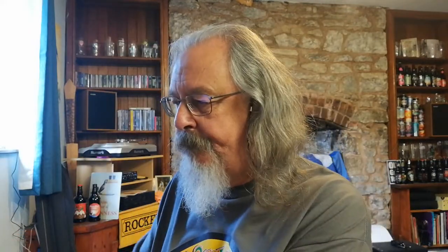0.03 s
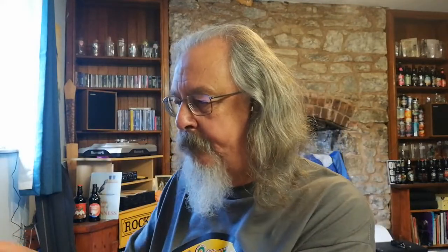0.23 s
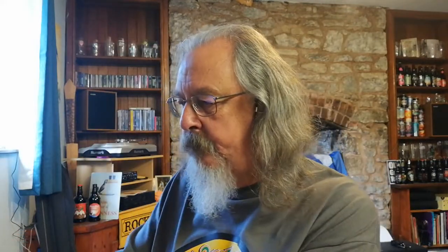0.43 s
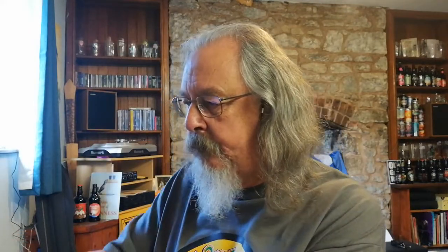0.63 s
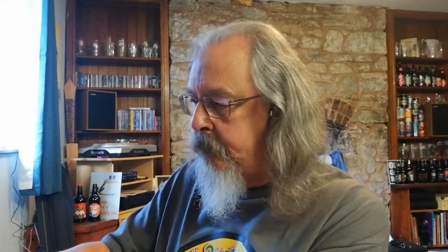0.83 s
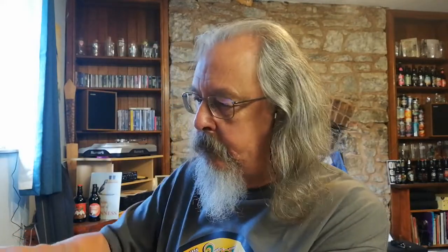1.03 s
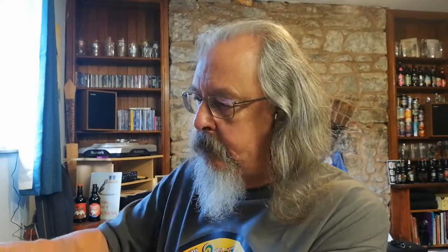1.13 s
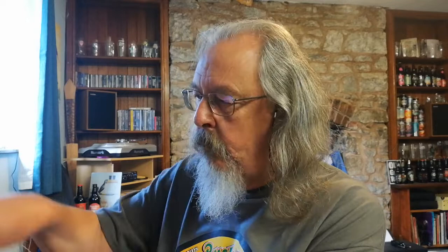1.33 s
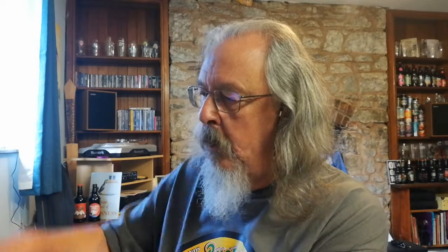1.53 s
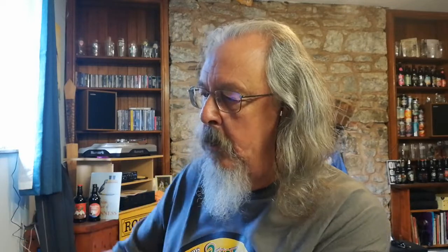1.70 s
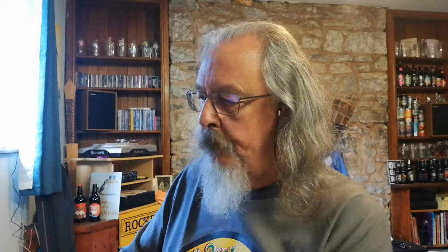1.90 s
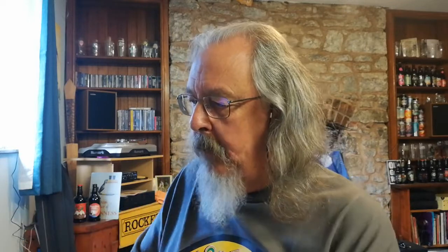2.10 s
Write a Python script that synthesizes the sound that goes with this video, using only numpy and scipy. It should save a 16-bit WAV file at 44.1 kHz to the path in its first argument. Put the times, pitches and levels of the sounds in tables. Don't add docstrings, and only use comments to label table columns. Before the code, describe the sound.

A glass bottle is opened with a metal opener: clinks, short gas hiss, cap pops and rings

```python
import sys
import numpy as np
from scipy import signal
from scipy.fft import rfft, irfft, next_fast_len
from scipy.io import wavfile
from scipy.ndimage import uniform_filter1d

SR = 44100
rng = np.random.default_rng(int(sys.argv[2]) if len(sys.argv) > 2 else 0)


def waveform_to_disk(signal):
    frames = np.transpose(np.atleast_2d(signal))
    scaled = np.clip(frames, -1, 1) * 32767
    samples = np.round(scaled).astype(np.int16)
    wavfile.write(sys.argv[1], SR, samples)


def boost(x):
    u = np.asarray(x, float) / 20
    return 10 ** u


N = 95167
T = np.arange(N) / SR
BAND_EDGES_HZ = 22 * 2 ** np.arange(0, 9.8, .5)

# frequency in Hz, level in dB.
AIR_COLOUR = [(120, -38), (200, -8), (612, -14), (1060, -4), (1500, -9), (2330, -15), (10000, -14.5),
              (13000, -21), (16000, -21)]
# frequency in Hz, level in dB.
RUMBLE_COLOUR = [(15, -31), (25, 0.5), (64, -2), (108, -25.5), (250, -5), (320, -63), (550, -120)]
# frequency in Hz, likeness from 0 to 1.
AIR_LIKENESS = [(100, .99), (200, .7), (380, 0)]
AIR_DB, RUMBLE_DB = -56, -56

# frequency in Hz, t60 in seconds.
ROOM_T60 = [(100, 0.62), (500, 0.24), (2000, 0.27), (6000, .22), (14000, 0.12)]
# frequency in Hz, likeness from 0 to 1.
ROOM_LIKENESS = [(150, .99), (400, .85), (1000, .3), (4000, 0)]
# frequency in Hz, difference in dB.
PORT_LEAN = [(200, 0), (350, 0), (690, 5), (2100, 2.5), (4000, 1.5), (8000, -1), (13000, 4.5)]
# frequency in Hz, lag in radians.
PORT_LAG = [(150, 0), (340, -.7), (690, -2.4), (1300, -.8), (2100, -3.2), (4000, 0), (9000, -2.5)]
TICK_ROOM_DB, KNOCK_ROOM_DB, RING_ROOM_DB, GAS_ROOM_DB, CAP_ROOM_DB = -5, -11, -13, 1.5, -29

# start in seconds, peak in dB, colour in Hz, length in seconds.
KNOCKS = [(0.12, -34, 100, 0.025), (0.159, -45.5, 126, 0.088), (0.203, -43, 123, 0.14),
          (0.277, -43, 620, 0.06), (0.306, -41.5, 68.5, 0.027), (0.454, -29, 136, 0.036),
          (0.612, -29.5, 146, 0.016), (0.681, -42, 75.6, 0.022), (1.312, -20, 110, 0.02),
          (1.427, -31, 70, 0.047), (1.537, -37, 120, 0.028), (1.649, -34.5, 260, 0.012),
          (1.724, -14, 302, 0.011), (1.844, -15.5, 200, 0.0084), (1.862, -18.5, 300, 0.018),
          (1.941, -25.5, 200, 0.026), (1.987, -25, 484, 0.012), (1.998, -8, 400, 0.006),
          (2.031, -22, 250, .006), (2.049, -23.5, 185, 0.012), (2.075, -39, 88.5, 0.018),
          (2.0065, -11, 380, .007), (2.059, -24, 200, .008), (1.852, -22, 220, .006), (.7, -48, 550, .03),
          (1.49, -38, 550, .04)]
# frequency in Hz, width in Hz, level in dB.
DESK_MODES = [(125, 40, -5), (276.7, 27, -7), (472, 40, -14), (647, 127, -0.5), (1000, 270, -29)]

# start in seconds, peak in dB, colour in Hz, width in Hz, length in seconds.
TICKS = [(0.455, -8.5, 13300, 4030, 0.0035), (.602, -16.5, 2470, 2440, 0.0073),
         (.6025, -9.5, 9200, 2500, 0.0012), (.677, -41, 4500, 600, 0.0045), (1.3115, -4, 5000, 9700, 0.003),
         (1.318, -10.5, 2090, 2870, 0.024), (1.3882, -13, 8000, 6000, 0.0038),
         (1.43, -13, 11000, 3500, 0.005), (1.435, -29, 2460, 5040, 0.055),
         (1.456, -40, 13500, 3000, 0.0037), (1.471, -24, 8000, 9000, 0.0021),
         (1.5545, -28, 11000, 9120, .002), (1.568, -17.5, 3300, 1200, 0.0019),
         (1.567, -21.5, 10500, 3000, 0.0043), (1.649, -20, 1560, 710, 0.0043),
         (1.655, -26.5, 1550, 1510, .002), (1.7278, -4, 3200, 1800, 0.0035),
         (1.7285, -12.5, 890, 1840, 0.03), (1.8585, -18, 3300, 1500, 0.003),
         (1.868, -35, 3200, 1000, 0.0018), (2.001, -29.5, 1500, 2040, 0.012),
         (2.153, -36, 9000, 8040, 0.008), (.46, -20, 7500, 3000, .003), (1.3155, -6, 8000, 9000, .003),
         (1.325, -12, 8800, 4000, .003), (1.398, -20, 8000, 4000, .003), (1.4265, -25, 11000, 5000, .003),
         (1.5652, -28, 3000, 2500, .002), (1.736, -18, 3200, 900, .003), (.61, -24, 1500, 2500, .006)]

# frequency in Hz, level in dB, t60 in seconds.
BOTTLE = [(1408, 4, .33), (1402, 1.5, .55), (1739, -1, .1), (1960, -8, .08), (3967, -8, .45),
          (3978, -10, .3), (7181, 5, .13), (7531, 9, .15), (11820, -5, .07), (13650, -8, .07)]
HOOKED = [(1384, 6, .11), (2234, 2, .06), (3187, -4, .05), (4430, 17, .015), (4199, -4, .08),
          (6589, -8, .05), (9180, 14, .02)]
TOUCHED = [(1400, 6, .07), (4650, 2, .03)]
PRIED = [(1373, 0, .06), (1949, 0, .08), (2541, 6, .05), (4124, -2, .08), (4630, 8, .04), (6670, 6, .04),
         (8812, 14, .045), (9878, 0, .06), (12000, 8, .02)]
RATTLE_ONE = [(4037, -3, .03), (7203, -14, .04), (8032, 9, .035), (12850, -14, .12), (14000, -8, .04)]
RATTLE_TWO = [(797, -20, .12), (2907, -20, .06), (4511, 0, .055), (7989, 1, .04), (9442, 3, .03),
              (12820, 6, .035), (13930, -10, .04), (14800, -20, .15)]
RATTLE_THREE = [(3994, -6, .13), (4554, -18, .1), (7332, -10, .15), (10490, -14, .07), (12780, -17, .35),
                (14290, -16, .1), (14750, -20, .1)]
SHAKEN = [(2740, -5, .03), (3340, 0, .04)]
LANDED = [(3300, 0, .02), (12800, -10, .1)]
RINGING_PARTS = [BOTTLE, HOOKED, TOUCHED, PRIED, RATTLE_ONE, RATTLE_TWO, RATTLE_THREE, SHAKEN, LANDED]
# start in seconds, level in dB, time of the damping grip in seconds,
# unevenness in dB.
RINGS = [
    (0.4564, -33, .6, 5),
    (.602, -34, .675, 5),
    (.675, -46, .8, 3),
    (1.312, -22.5, 1.43, 5),
    (1.388, -21, 1.43, 4),
    (1.43, -15, 1.555, 3),
    (1.4714, -22, 1.555, 3),
    (1.567, -30, 1.7, 3),
    (1.859, -32, 1.95, 3),
]
GRIP_DB_PER_S, WOBBLE_STEP_S = 3000, 0.00466

# time in seconds, level in dB.
GAS_LEVEL = [(1.038, -64), (1.044, -26.5), (1.058, -18), (1.108, -17.5), (1.153, -17.5), (1.178, -55),
             (1.2, -44)]
# frequency in Hz, level in dB per Hz.
GAS_COLOUR = [(410, -63), (700, -73), (898, -32), (2530, -25.5), (4610, -16.5), (6070, -19), (9230, 1),
              (13700, -6), (16000, -19)]
GAS_FLUTTER_DB, GAS_DB = 3, -1.5

# frequency in Hz, level in dB, t60 in seconds,
# facing in turns, steady share, side-lobe share, null-fill share, lag in turns.
CAP_AT_PORTS = [
    [(3995, 14, .154, .035, .076, .11, .13, 0), (7975, -5.6, .13, .338, -.75, .67, .75, 0),
     (11980, -19, .06, 0, 1.5, 0, 0, 0)],
    [(3995, 7, .14, -.155, -.35, -.05, .05, -.04), (7975, -4.8, .18, .214, -.48, -.51, .1, .25),
     (11980, -21, .09, 0, 1.5, 0, 0, .25)],
]
DROP_S, CAP_RISE_S, SPIN_PER_S, LAND_S, LAND_LOSS_DB = 1.729, .04, 11, 1.86, -2

# end in seconds, length in seconds, depth in dB.
DIPS = [
    (0.448, 0.0087, 0),
    (1.3, 0.02, -4.5),
    (1.727, 0.017, -20),
]
TOP_CUT_HZ = 15800
HEADROOM = 1.8


def rms_one(x):
    return x / np.sqrt(np.mean(x ** 2) + 1e-20)


def at_hz(points, hz):
    table = np.array(points)
    return np.interp(np.log(hz), np.log(table[:, 0]), table[:, 1])


def drift(rate_hz):
    r = np.exp(-2 * np.pi * rate_hz / SR)
    settle = 9000
    wander = signal.lfilter([1], [1, -2 * r, r * r], rng.standard_normal(N + settle))
    return rms_one(wander[settle:])


def resonance(x, hz, width_hz):
    r = np.exp(-np.pi * width_hz / SR)
    poles = [1, -2 * r * np.cos(2 * np.pi * hz / SR), r * r]
    return signal.lfilter([(1 - r * r) / 2, 0, (r * r - 1) / 2], poles, x)


def noise_bands(likeness, size):
    white = rng.standard_normal((2, 2, size))
    for k, (low, high) in enumerate(zip(BAND_EDGES_HZ, BAND_EDGES_HZ[1:])):
        band = signal.butter(2, [low, high], "band", fs=SR, output="sos")
        mid, side = signal.sosfilt(band, white[k % 2])
        hz = np.sqrt(low * high)
        alike = np.clip(at_hz(likeness, hz), 0, 1)
        yield hz, np.sqrt(1 + alike) * mid + np.sqrt(1 - alike) * side * [[1], [-1]]


def burst(length_s, size):
    t = np.arange(size) / SR
    decay = np.exp(-2 * t / max(length_s, 1e-4))
    return rng.standard_normal(size) * decay * np.clip(t / 0.00018, 0, 1)


def add(out, start_s, db, piece):
    i = int(start_s * SR)
    scaled = boost(db) * piece / np.abs(piece).max()
    out[..., i:i + piece.shape[-1]] += scaled[..., :N - i]


def air():
    parts = [(hz, v * boost(1.5 * drift(18))) for hz, v in noise_bands(AIR_LIKENESS, N)]
    hiss = sum(v * boost(at_hz(AIR_COLOUR, hz)) for hz, v in parts if hz > 200)
    rumble = sum(v * boost(at_hz(RUMBLE_COLOUR, hz)) for hz, v in parts if hz < 200)
    return boost(AIR_DB) * rms_one(hiss) + boost(RUMBLE_DB) * rms_one(rumble)


def room_tail():
    t = np.arange(SR // 2) / SR
    tail = np.zeros((2, len(t)))
    for hz, v in noise_bands(ROOM_LIKENESS, len(t)):
        t60 = at_hz(ROOM_T60, hz)
        tail += v * boost(-60 * t / t60) / np.sqrt(t60)
    onset = np.clip(t / 0.0017 - .3, 0, 1)
    return rms_one(tail * onset) / np.sqrt(len(t))


def through_ports(direct, sent):
    size = next_fast_len(N + SR)
    hz = np.maximum(np.arange(size // 2 + 1) * SR / size, 1)
    half = boost(at_hz(PORT_LEAN, hz) / 2) * np.exp(-.5j * at_hz(PORT_LAG, hz))
    spectrum = rfft(direct, size) + rfft(sent, size) * rfft(room_tail(), size)
    return irfft(spectrum * [half, 1 / half], size)[:, :N]


def desk_knocks():
    out = np.zeros(N)
    for start_s, db, colour_hz, length_s in KNOCKS:
        soften = signal.butter(2, 3.5 * colour_hz, fs=SR, output="sos")
        push = resonance(burst(length_s, 8192), colour_hz, 0.7 * colour_hz)
        push = signal.sosfilt(soften, push)
        desk = sum(boost(d) * resonance(push, hz, width_hz) for hz, width_hz, d in DESK_MODES)
        add(out, start_s, db, push + desk)
    return out


def metal_ticks():
    out = np.zeros(N)
    for start_s, db, hz, width_hz, length_s in TICKS:
        crack = resonance(burst(length_s, 2048), hz, width_hz)
        add(out, start_s, db, 0.6 * crack + resonance(crack, hz, width_hz))
    return out


def struck_parts():
    out = np.zeros(N + SR)
    t = np.arange(SR // 2) / SR
    for (start_s, db, until_s, uneven_db), part in zip(RINGS, RINGING_PARTS):
        i = int(start_s * SR)
        grip = GRIP_DB_PER_S * np.maximum(t + start_s - until_s, 0)
        for hz, mode_db, t60 in part:
            chance = np.interp(t / WOBBLE_STEP_S, np.arange(200), rng.standard_normal(200))
            wobble = uneven_db * min(hz / 6000, 1) * chance
            level = db + mode_db + wobble - grip - 60 * t / t60
            out[i:i + len(t)] += boost(level) * np.sin(2 * np.pi * hz * t)
    return out[:N]


def gas_jet():
    jet = np.zeros(N)
    for hz, v in noise_bands(ROOM_LIKENESS, N):
        low_cut = 40 * (hz < 600)
        jet += v[0] * boost(at_hz(GAS_COLOUR, hz) - low_cut + drift(39))
    s, db = np.transpose(GAS_LEVEL)
    level = np.interp(T, s, db, -120) - 200 * np.maximum(T - s[-1], 0)
    return rms_one(jet) * boost(level + GAS_DB + GAS_FLUTTER_DB * drift(90))


def spinning_cap():
    t = np.maximum(T - DROP_S, 0)
    out = np.zeros((2, N))
    for port, modes in enumerate(CAP_AT_PORTS):
        for hz, db, t60, facing, steady, side, fill, lag in modes:
            turn = 2 * np.pi * (SPIN_PER_S * t + facing)
            lobes = np.cos(turn) + side * np.cos(3 * turn) + steady + 1j * fill
            tone = np.exp(2j * np.pi * (hz * t - lag))
            out[port] += boost(db - 60 * t / t60) * np.imag(lobes * tone)
    rise = 1 - np.exp(-t / CAP_RISE_S)
    return out * rise * boost(LAND_LOSS_DB * (T > LAND_S))


def scene():
    knock, tick, ring = desk_knocks(), metal_ticks(), struck_parts()
    jet, spin = gas_jet(), spinning_cap()
    sent = boost(TICK_ROOM_DB) * tick + boost(KNOCK_ROOM_DB) * knock + boost(RING_ROOM_DB) * ring
    sent += boost(GAS_ROOM_DB) * jet + boost(CAP_ROOM_DB) * spin[0]
    return through_ports(tick + knock + ring + jet, sent) + spin + air()


def band_limit(x):
    return signal.sosfilt(signal.butter(12, 16990, fs=SR, output="sos"), x)


def record(dry):
    dip_db = sum(db * (T > end_s - length_s) * (T < end_s) for end_s, length_s, db in DIPS)
    dipped = dry * boost(uniform_filter1d(dip_db, size=90))
    soft = HEADROOM * np.tanh(dipped / HEADROOM)
    top_cut = signal.cheby2(12, 50, TOP_CUT_HZ, fs=SR, output="sos")
    return band_limit(signal.sosfilt(top_cut, soft))


dry = scene()
out = record(dry)
waveform_to_disk(out)
```